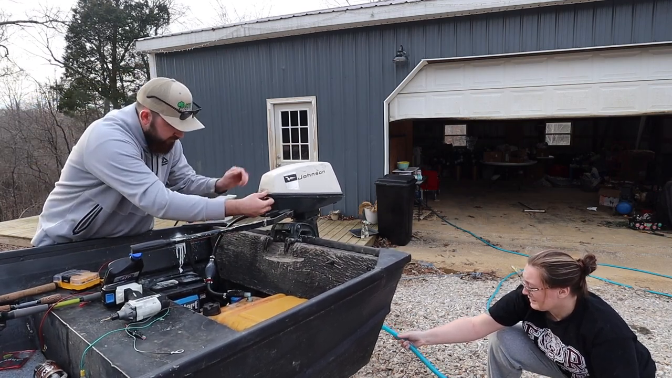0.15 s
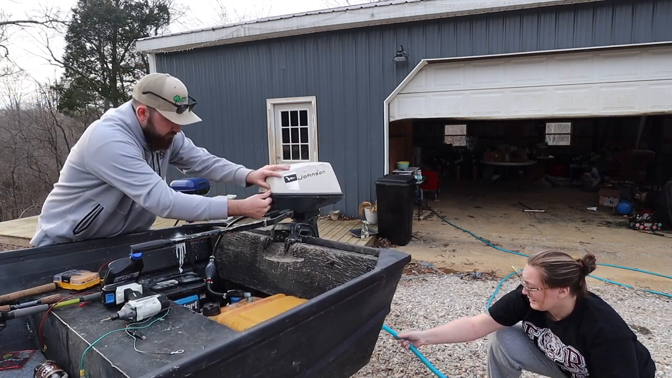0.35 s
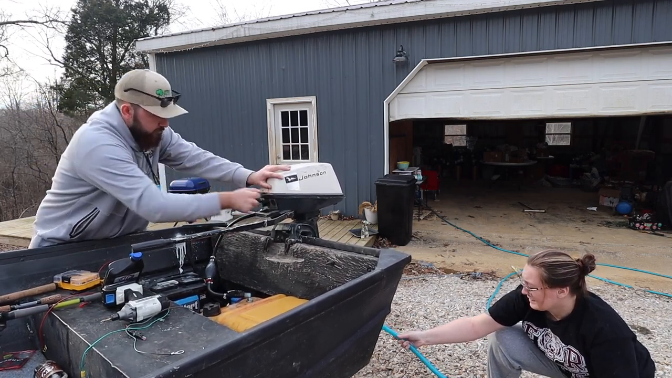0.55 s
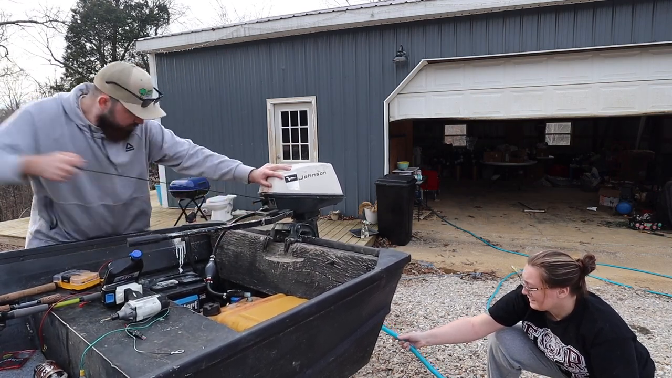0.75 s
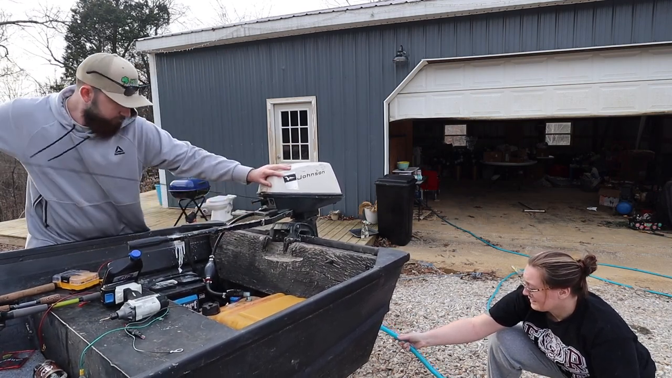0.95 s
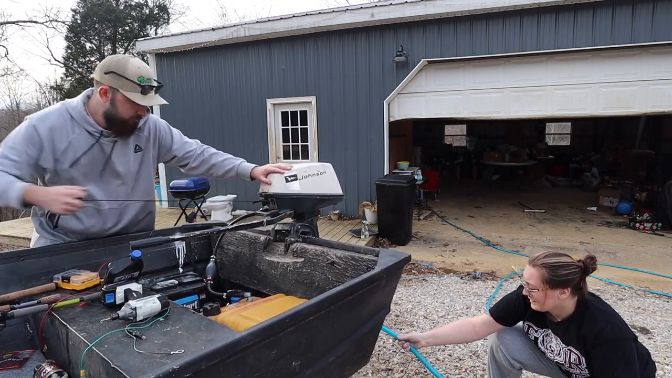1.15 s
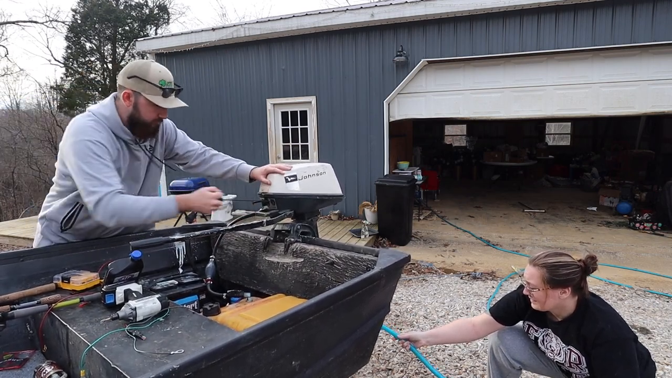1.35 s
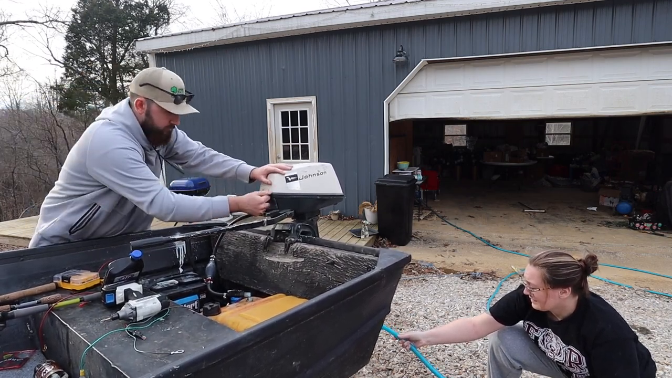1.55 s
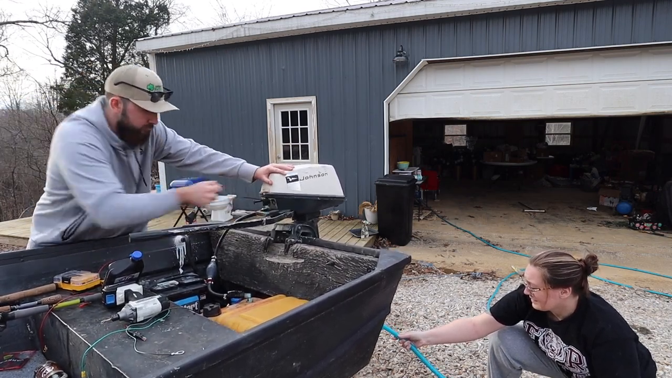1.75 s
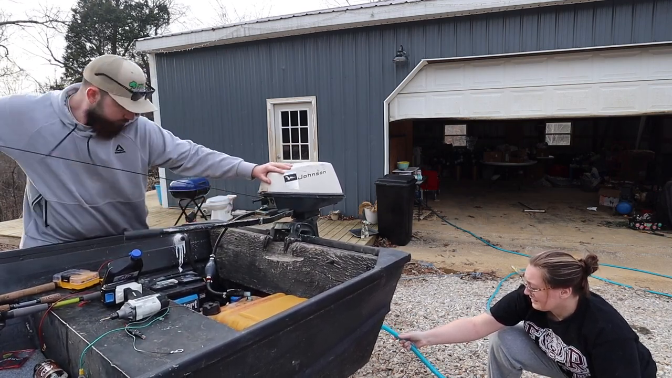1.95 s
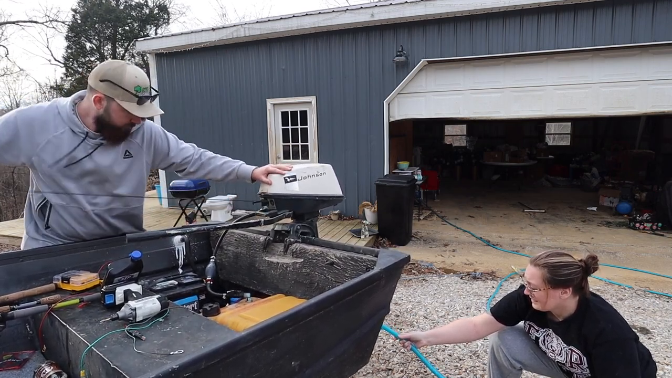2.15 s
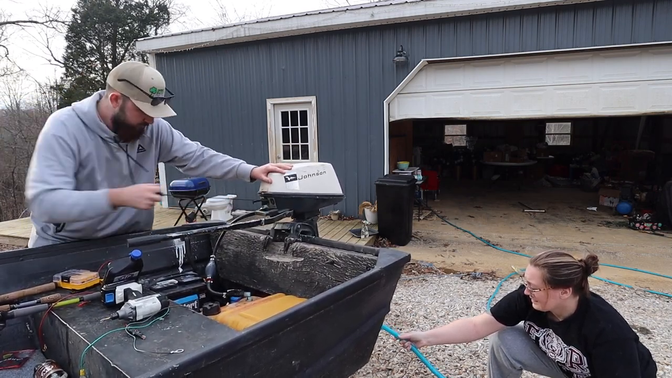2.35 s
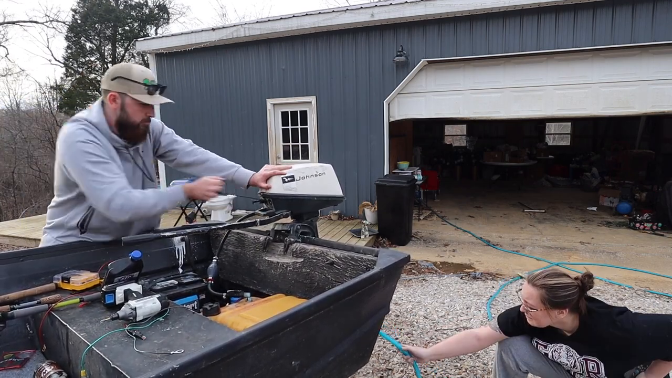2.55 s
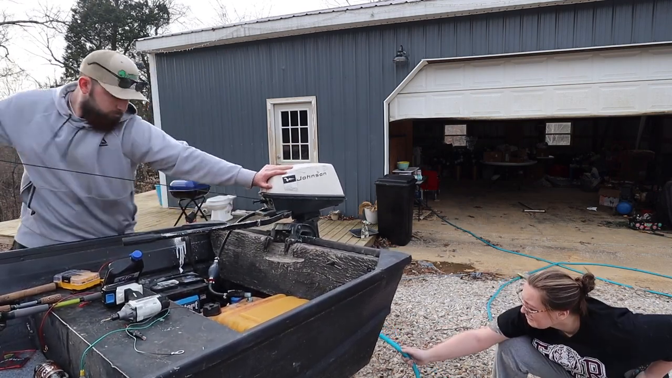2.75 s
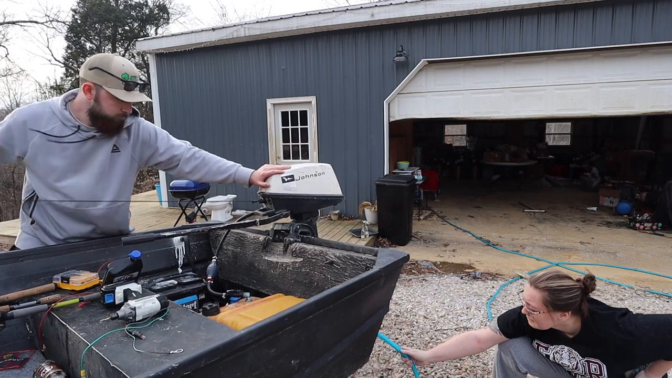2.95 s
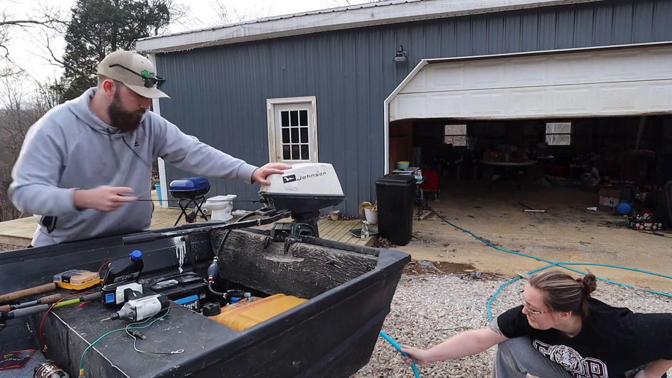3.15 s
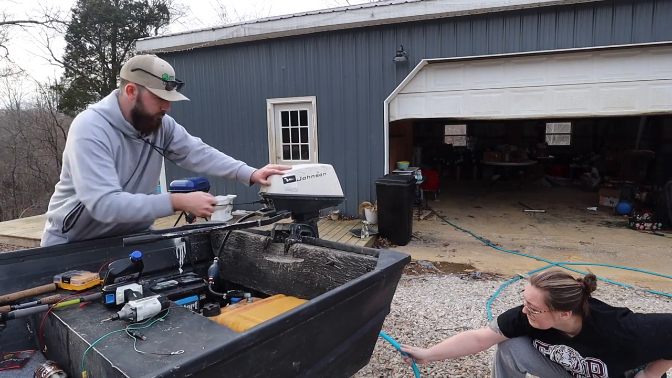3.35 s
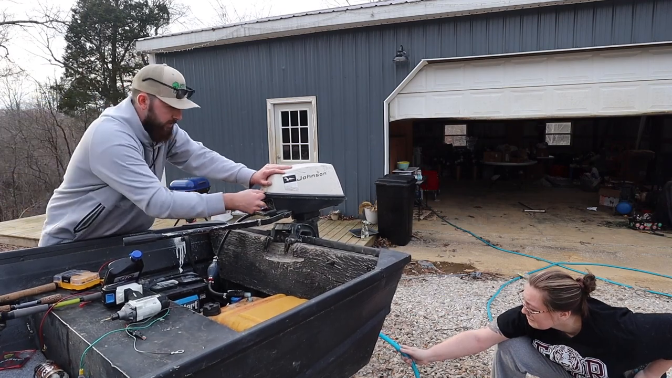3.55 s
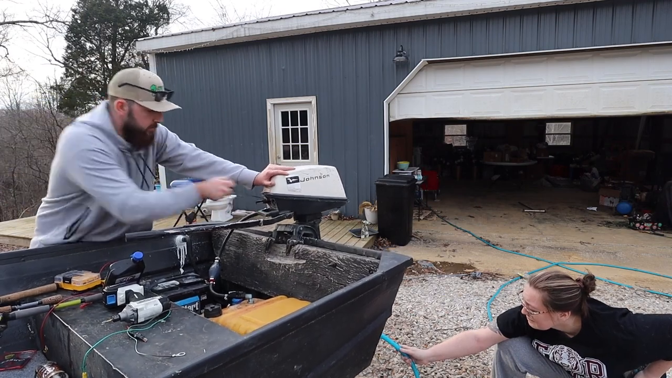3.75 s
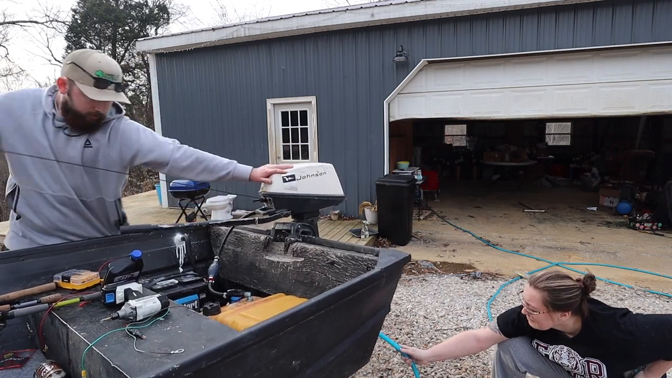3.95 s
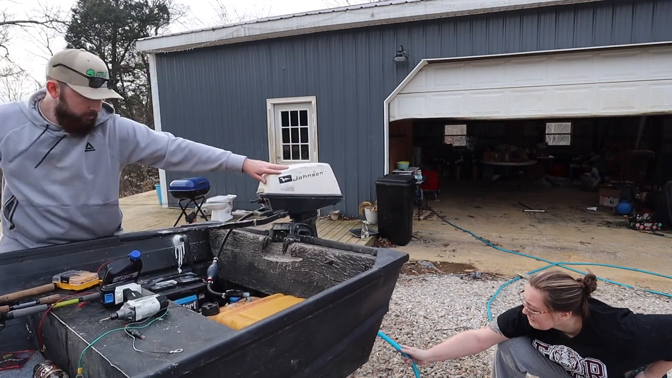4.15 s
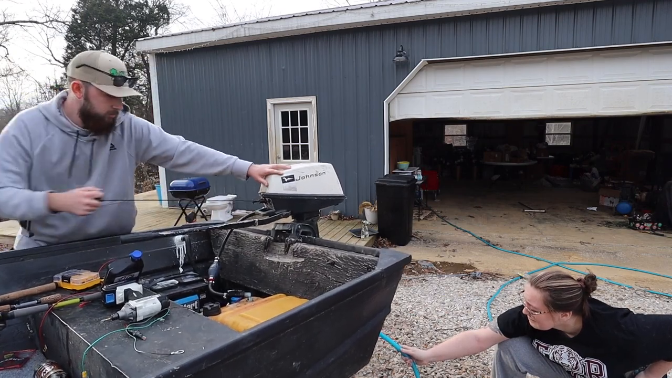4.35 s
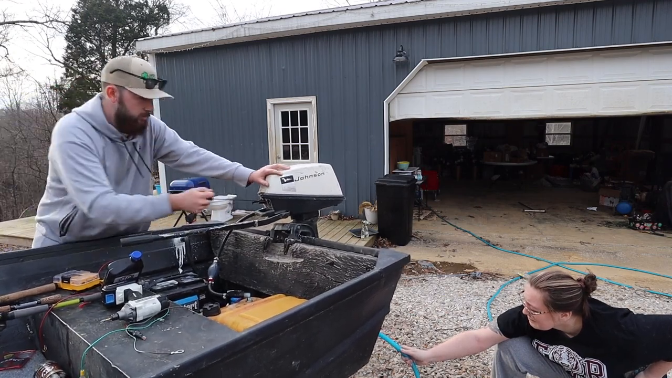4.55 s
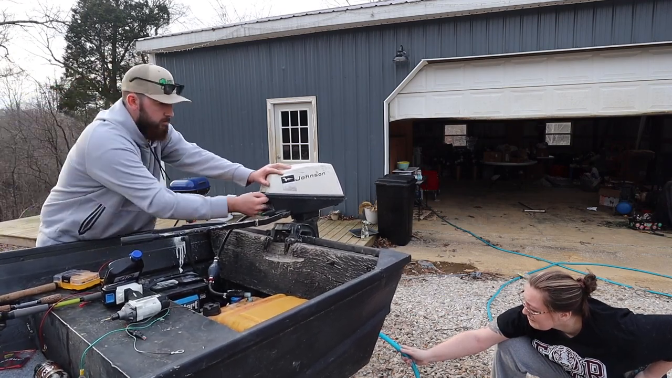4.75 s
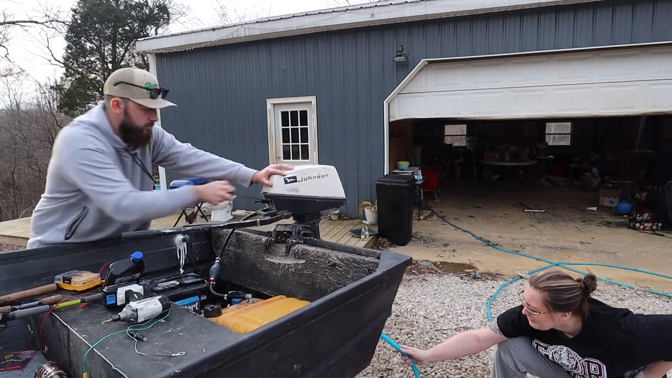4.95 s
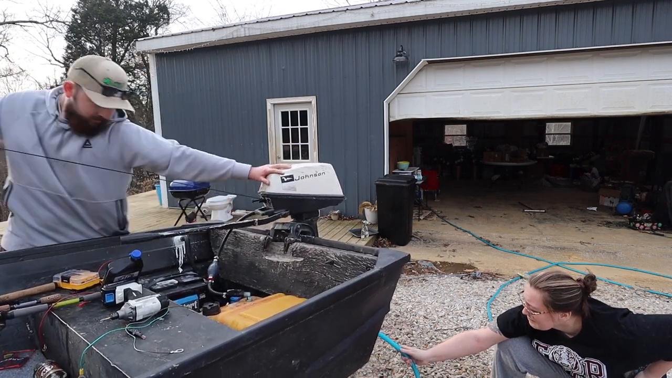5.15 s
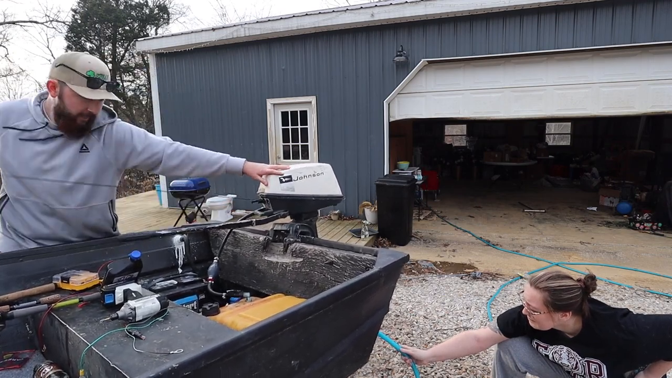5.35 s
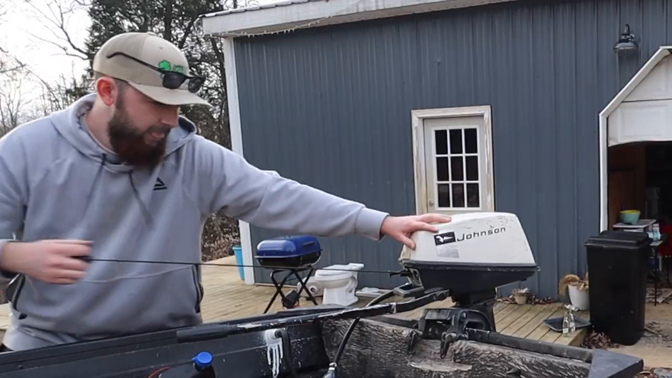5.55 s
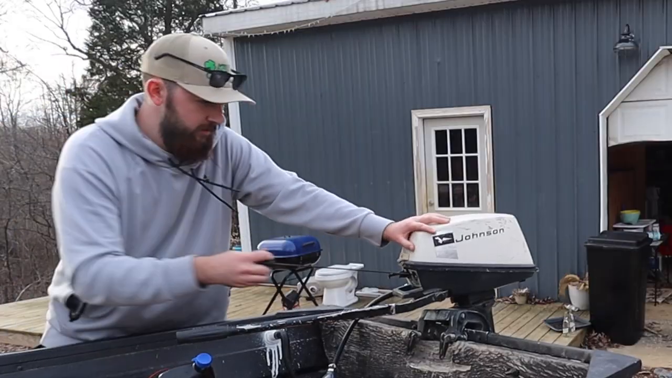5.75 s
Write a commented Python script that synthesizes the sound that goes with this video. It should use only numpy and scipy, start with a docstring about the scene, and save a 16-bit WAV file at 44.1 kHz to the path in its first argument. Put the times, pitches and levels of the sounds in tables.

```python
"""In a gravel yard, a small outboard's starter cord is pulled five times. The pinion clacks into the
flywheel, the teeth whine upward as their meshing rate rises, then the pinion drops out and the cord
rewinds. Impact and friction excite the modes of metal and cowl; the hull booms and the plastic handle
clicks. Hose water splatters on the gravel, wind buffets the microphone, a faint hum is heard at first,
and a limiter ducks under the hardest clacks."""
import sys
import numpy as np
from scipy import signal
from scipy.fft import rfft, irfft, next_fast_len
from scipy.io import wavfile
from scipy.ndimage import minimum_filter1d, map_coordinates

SR = 44100
rng = np.random.default_rng(int(sys.argv[2]) if len(sys.argv) > 2 else 0)


def wrap_up_sound(samples):
    """Save the sound to the file named by the first command line argument, as 16-bit audio."""
    columns = np.atleast_2d(samples).T
    # keep every value between -1 and 1, then stretch to whole-number steps
    tamed = np.clip(columns, -1, 1)
    steps = np.round(tamed * 32767).astype(np.int16)
    wavfile.write(sys.argv[1], SR, steps)


N = 256220

# Levels are relative within each table.
# cord rewinds: (start [s], end [s], level [dB], brightness [dB], spin-up [s], fade [dB/s])
REWINDS = [(0, .2, -37, 2, 0.026, 69), (1.05, 1.26, -15, -3, 0.06, 25), (1.31, 1.53, -18.5, -12, 0.056, 75),
           (2.15, 2.5, -16.5, -9, 0.07, 30), (2.94, 3.58, -19.5, -15, 0.082, 20.5),
           (4.17, 4.66, -18.5, -9, 0.09, 28), (5.345, 5.44, -23, -12, 0.025, 20),
           (5.45, 5.81, -20, -13, 0.064, 25)]
# water splatter as heard, stepping up abruptly at 4.7 s: (time [s], level [dB])
SPLATTER_LEVEL = [(0, -37.5), (.29, -39), (.9, -37.5), (1.0, -35.5), (1.75, -41), (2.3, -40), (2.8, -40.5),
                  (2.95, -40), (3.5, -43), (3.78, -35), (4.12, -40), (4.66, -43), (4.7, -36.5),
                  (5.81, -39.5)]
# largest drops: (time [s], level [dB], frequency [Hz])
SPLATS = [(0.216, -23, 5850), (0.5536, -11, 5450), (0.9452, -11, 6140), (1.015, -3.5, 7850),
          (1.061, -7, 7700), (1.6384, -8.5, 5700), (3.476, -12, 13300), (3.67, -8.5, 5620),
          (4.695, -12, 5630), (4.703, -6.5, 5700), (5.643, -7.5, 6100)]
# wind gusts: (time [s], level [dB], half-width [s])
GUSTS = [(.6, -52, 0.13), (1.17, -42, 0.37), (1.691, -22.5, 0.033), (2.24, -22.5, 0.12), (2.45, -36, 0.094),
         (3.08, -40, 0.074)]
# handle clicks: (time [s], level [dB], frequency [Hz])
CLICKS = [(.215, -18, 2600), (.319, -9.5, 2130), (.518, -15, 2800), (.632, -10, 4200), (1.619, -25, 2480),
          (3.617, -27, 3000), (4.879, -13.5, 2520)]
# pinion and handle knocks: (time [s], level [dB], cowl drive offset [dB], decay time [s])
KNOCKS = [(0.373, -7.5, -26.5, 0.023), (0.591, 7, -27.5, 0.0093), (1.576, -26.5, -7, 0.0066),
          (1.764, 12, -30.5, 0.016), (2.193, -0.5, -31.5, 0.0094), (2.515, 1.5, -19, 0.01),
          (2.884, -12, -26, 0.0097), (3.186, -5.5, -21, 0.008), (3.782, -18, -9, 0.013),
          (3.796, 14.5, -29, 0.015), (4.078, 2, -29, 0.0055), (4.59, -30.5, -9, 0.06),
          (4.985, 13.5, -28.5, 0.016), (5.293, 0.5, -33, 0.0073), (5.782, -28.5, -7.5, 0.022)]
# cord pulls: (start [s])
PULL_STARTS = [.612, 1.785, 2.535, 3.813, 5.003]
# the same pulls: (end [s], whine level [dB], ring level [dB], hull level [dB])
PULL_ENDS = [(.99, -11, -20, -21.5), (2.085, -16, -22, -23), (2.887, -12.5, -22, -21.5),
             (4.092, -10.5, -20.5, -24), (5.3, -18, -21.5, -20.5)]
PULLS = np.column_stack([PULL_STARTS, PULL_ENDS])
# lurches past compression: (time [s], tooth rate reached [Hz], whine level [dB], ring level [dB])
LURCHES = [(0.664, 277, -14.5, -20), (0.699, 487.3, -16, -1), (0.766, 678, -11.5, -15),
           (.795, 695, -31, -11), (0.831, 722.5, -31, -20), (0.866, 765.5, -19.5, -17.5),
           (1.816, 302, -15.5, -22), (1.85, 623, -32, -25), (1.9, 712, -24, -20), (1.932, 745, -25, -15),
           (1.961, 783, -27, -31), (2.611, 286.4, -21.5, -35), (2.645, 516.6, -28, -16),
           (2.7, 699, -24.5, -9), (2.756, 754.6, -18, -20), (3.846, 288.8, -19, -26),
           (3.861, 479.3, -27, -23), (3.88, 622.7, -21.5, -15), (3.93, 727, -36, -16),
           (3.975, 813, -20.5, -25), (5.037, 300.6, -11.5, -26), (5.055, 467, -26, -33),
           (5.07, 589.2, -30, -20), (5.119, 724, -17.5, -7), (5.15, 737, -19, -27),
           (5.175, 818.3, -18, -23), (5.214, 818.6, -13.5, -26)]
# pinion entering or leaving mesh: (time [s], level [dB], duration [s])
GRINDS = [(0.962, -12, 0.029), (1.734, -15.5, 0.056), (2.1, -9, 0.013), (2.878, -9, 0.027),
          (3.775, -18, 0.028), (4.089, -7.5, 0.023), (4.962, -18, 0.027), (5.289, -9.5, 0.022)]

# cast flywheel and housing: (frequency [Hz], bandwidth [Hz], level [dB])
METAL_MODES = [(1083, 28, -9), (1634, 20, 3.5), (1805, 27.7, 0), (1963, 87, -5), (2072, 49, 1.5),
               (2246, 21, -3), (2726, 55, -9.5), (3120, 24, 4.5), (3330, 94, -2.5), (3465, 56, 2),
               (3880, 55, -12)]
# thin pulley and spring: (frequency [Hz], bandwidth [Hz], level [dB])
PULLEY_MODES = [(4817, 35, -1), (4937, 60, -6), (5430, 80, -20), (7000, 33, -17.5), (11400, 63, -25.5)]
# cowl and hull: (frequency [Hz], bandwidth [Hz], level [dB])
COWL_MODES = [(154, 53, -4.5), (279, 70, 0.5), (455, 52, -0.5), (692, 76, 1.5), (866.4, 86, 3.5)]

# non-resonant rubbing: (frequency [Hz], level [dB])
SCRAPE_SPECTRUM = [(150, -11.5), (700, -0.5), (3000, 2), (6000, -5.5), (15000, -26)]
# fine spray: (frequency [Hz], level [dB])
SPRAY_SPECTRUM = [(120, -52), (200, -5), (268, 0), (1340, -4.5), (1610, -8), (2190, -2), (6110, -6.5),
                  (15800, -24)]
# wind on the microphone: (frequency [Hz], level [dB])
WIND_SPECTRUM = [(12, -6), (30, 3), (48, 1), (70, 10), (110, -7), (200, -43), (500, -36)]
# crack of a knock: (frequency [Hz], level [dB])
CRACK_SPECTRUM = [(150, -10), (800, -2.5), (2500, 4), (4000, -5), (6000, -8), (15000, -28)]
# thud of the rocking hull: (frequency [Hz], level [dB])
THUD_SPECTRUM = [(12, -23), (25, -32), (70, 12), (110, 8), (200, -47), (500, -68)]

TIME = np.arange(N) / SR


def amp(db):
    """Amplitude ratio of a level in decibels."""
    return 10 ** (np.asarray(db) / 20)


def unit(x):
    """Normalisation to rms 1."""
    return x / np.sqrt(np.mean(x ** 2) + 1e-20)


def gain_at(spectrum, hz):
    """Amplitude gain, with levels interpolated on a logarithmic frequency axis."""
    knots_hz, db = np.transpose(spectrum)
    return amp(np.interp(np.log(hz + 1), np.log(knots_hz + 1), db))


def curve(points):
    """Linear interpolation of (time, value) points at every sample."""
    return np.interp(TIME, *np.transpose(points))


def strokes(rows, edge_s):
    """Gating: per sample, the current row, the time since its start, and a gate open during it."""
    rows = np.array(rows)
    row = rows[np.clip(np.searchsorted(rows[:, 0] - edge_s, TIME) - 1, 0, None)].T
    since = TIME - row[0]
    return row, since, np.clip(np.minimum(since, row[1] - TIME) / edge_s + 1, 0, 1)


def wobble(rate):
    """Random modulation: a spline through `rate` Gaussian values a second."""
    return map_coordinates(rng.standard_normal(int(N * rate / SR) + 4), [TIME * rate])


def filtered(x, response):
    """Linear filtering: the spectrum is multiplied by a frequency response."""
    size = next_fast_len(N + SR // 2)
    return irfft(rfft(x, size) * response(np.fft.rfftfreq(size, 1 / SR)), size)[:N]


def ringing(x, modes):
    """Modal superposition: x drives damped resonators of alternating polarity."""
    return filtered(x, lambda f: sum(
        (-1) ** k * amp(db) * 1j * f * width / (hz * hz - f * f + 1j * f * width)
        for k, (hz, width, db) in enumerate(modes)))


def coloured(x, spectrum):
    """Spectral shaping, at rms 1."""
    return unit(filtered(x, lambda hz: gain_at(spectrum, hz)))


def grit(rate, spread_db):
    """Amplitude-modulated noise at rms 1; its level shifts about `rate` times a second."""
    return unit(rng.standard_normal(N) * amp(spread_db * wobble(rate)))


def pings(onset_s, db, hz, cycles):
    """Free decay: each impact leaves a sinusoid that falls to 1/e in `cycles` periods."""
    samples = np.arange(128)
    periods = hz[:, None] * samples / SR
    waves = amp(db)[:, None] * np.sin(2 * np.pi * periods) * np.exp(-periods / cycles)
    at = (onset_s * SR).astype(int)[:, None] + samples
    return np.bincount(at.ravel(), waves.ravel(), N)[:N]


def rewinds():
    """Friction: freewheeling pinion and spring excite the modes as the spool spins up, then slows."""
    (_, _, peak_db, bright_db, rise_s, fade), since, gate = strokes(REWINDS, edge_s=0.021)
    level_db = peak_db - 5.5 * np.clip(1 - since / rise_s, 0, 2) - fade * (since - rise_s).clip(0)
    friction = grit(400, spread_db=3.5) * amp(1.8 * wobble(30))
    force = friction * amp(level_db + 15) * gate
    pulley = ringing(force * amp(bright_db + 11.5), PULLEY_MODES)
    rub = amp(level_db - 6) * gate * coloured(friction, SCRAPE_SPECTRUM)
    return ringing(force, METAL_MODES) + pulley + amp(-6) * ringing(force, COWL_MODES) + rub


def water():
    """Jet break-up: fairly even spurts of drops crackle over a spray; the largest burst as splats."""
    spurts = 800  # the six drops of each land together and have a like size
    timing, strength, pitch = rng.random((spurts, 3)).T[..., None]
    drop_lag, drop_strength, drop_pitch = np.moveaxis(rng.random((spurts, 6, 3)), -1, 0)
    onset_s = (np.arange(spurts)[:, None] + timing) / (spurts + 1) * N / SR + 0.0061 * drop_lag
    db = 11 * strength ** 2 + 8 * drop_strength
    hz = np.clip(3900 * 2.64 ** pitch * 1.635 ** (2 * drop_pitch - 1), 0, 15500)
    crackle = unit(pings(onset_s.ravel(), db.ravel(), hz.ravel(), cycles=2.4))
    spray = coloured(grit(25, spread_db=2.2), SPRAY_SPECTRUM)
    splatter = amp(curve(SPLATTER_LEVEL) + 6) * (crackle * amp(0.38 * wobble(9.1)) + amp(-1.5) * spray)
    onset_s, db, hz = np.transpose(SPLATS)
    splats = sum(
        pings(onset_s + lag_s, db - loss_db, hz * np.exp(rng.normal(0, scatter, len(hz))), cycles=6.6)
        for lag_s, loss_db, scatter in [(0, 8.8, 0.029), (.0004, 2, 0.48), (.0012, 8, 0.18)])
    return splatter + splats


def wind():
    """Turbulence: low-frequency pressure fluctuations buffet the microphone in gusts."""
    breeze = amp(-48.5)
    gusts = sum(amp(db) * np.exp(-((TIME - s) / width) ** 2) for s, db, width in GUSTS)
    buffeting = amp(3.11 * wobble(12)) * coloured(rng.standard_normal(N), WIND_SPECTRUM)
    return (breeze + gusts) * unit(buffeting)


def hum(hz=94, end_s=0.66):
    """Amplitude and frequency modulation: a faint low tone wavers, then stops."""
    envelope = amp(-43 + 1.3 * wobble(9.6)) * np.clip((end_s - TIME) / 0.054, 0, 1)
    return envelope * np.sin(2 * np.pi * np.cumsum(hz + 3 * wobble(14)) / SR)


def clicks():
    """Damped vibration: three quick contacts of the plastic handle make each short, hollow click."""
    onset_s, db, hz = np.transpose(CLICKS)
    return sum(pings(onset_s + lag_s, db - loss_db, hz * ratio, cycles=3.6)
               for lag_s, loss_db, ratio in [(0, 4, 1.45), (.0012, 0.1, 1.01), (.003, 5, .85)])


def knocks(attack_s=.0012):
    """Impact excitation: a brief chatter of contacts cracks and sets metal and cowl ringing."""
    sharp, heavy = np.zeros((2, N + SR))
    t = np.arange(SR // 10) / SR
    for s, db, cowl_db, decay_s in KNOCKS:
        envelope = np.exp(-(t / decay_s) ** 2) * np.clip(t / attack_s, 0, 1)
        chatter = amp(db) * envelope * rng.standard_normal((2, len(t)))
        sharp[round(s * SR):][:len(t)] += chatter[0]
        heavy[round(s * SR):][:len(t)] += chatter[1] * amp(cowl_db)
    crack = filtered(sharp[:N], lambda hz: gain_at(CRACK_SPECTRUM, hz))
    metal = ringing(sharp[:N], METAL_MODES)
    return amp(-11.5) * crack + amp(-5.5) * metal + amp(29.5) * ringing(heavy[:N], COWL_MODES)


def flywheel(crawl_hz=163.6, climb_hz_per_s=9000, sag_hz_per_s=200, rise_s=.014, fade_s=0.023):
    """Varying load: each lurch past compression lifts the tooth rate and makes whine and ring surge."""
    points, surges = [], 0
    for start, end, *_ in PULLS:
        points.append((start, crawl_hz))
        for s, hz, *db in (row for row in LURCHES if start < row[0] < end):
            last_s, last_hz = points[-1]
            release_s = np.clip(s - (hz - last_hz) / climb_hz_per_s, last_s + .001, s - .001)
            sagged_hz = max(last_hz - sag_hz_per_s * (release_s - last_s), crawl_hz)
            points += [(release_s, sagged_hz), (s, hz)]
            # the whine surges as the climb begins, the ring as it ends
            attack = np.clip((TIME - [[release_s], [s]]) / rise_s + 1, 0, 1)
            surges = surges + amp(db)[:, None] * attack * np.exp(-(TIME - s).clip(0) / fade_s)
        last_s, last_hz = points[-1]
        points.append((end, last_hz - sag_hz_per_s * (end - last_s)))
    return curve(points), surges


def pulls(rise_s=0.068, fade_db_per_s=45, blow_cutoff_hz=2770, rub_cutoff_hz=6460):
    """Gear meshing: periodic tooth impacts whine in harmonics, growl in the cowl and ring the metal."""
    (_, _, whine_db, ring_db, _), since, gate = strokes(PULLS, edge_s=0.003)
    tooth_hz, (whine_surge, ring_surge) = flywheel()
    effort = amp(whine_db - fade_db_per_s * since.clip(0)) * np.clip(since / rise_s, .4, 1)
    load = gate * (effort + whine_surge)
    drone = gate * amp(ring_db) * np.clip(since / rise_s, .1, 1)
    clang = gate * ring_surge
    phase = 2 * np.pi * np.cumsum(tooth_hz * (1 + .025 * wobble(160))) / SR
    throb = amp(3.5 * wobble(45))
    harmonics = sum(amp(db + 5 * wobble(85)) / 1.25 * np.sin(k * phase)
                    for k, db in [(1, 2), (2, -4), (3, -11), (4, -18), (5, -23)])
    whine = amp(-0.5) * load * harmonics * np.sqrt(throb)
    pulses = np.exp(12 * np.cos(phase)) * amp(3.5 * wobble(500))  # one per tooth
    teeth = unit(pulses * throb) + 0.55 * grit(300, spread_db=4.5) * throb
    # loaded teeth strike dully and favour the gear's own pair of modes
    blows = filtered(teeth * (drone + clang) * amp(14), lambda f: 1 / (1 + 1j * f / blow_cutoff_hz) ** 2)
    metal = ringing(blows, METAL_MODES) + amp(5.5) * ringing(blows, METAL_MODES[3:5])
    build_up = since.clip(0) / .35
    pulley = ringing(drone * build_up * grit(300, spread_db=2), PULLEY_MODES)
    scrape = coloured(grit(200, spread_db=2.5), SCRAPE_SPECTRUM)
    rub = (drone + .3 * clang) * filtered(scrape, lambda f: 1 / (1 + (f / rub_cutoff_hz) ** 2))
    growl = load * np.sqrt(tooth_hz / tooth_hz.max()) * (unit(teeth) + grit(100, spread_db=2))
    return whine + metal + amp(17.5) * pulley + amp(8) * ringing(growl, COWL_MODES) + amp(0.1) * rub


def hull(lag_s=0.051, rise_db_per_s=40.5, fall_db_per_s=77, rest_db=-63):
    """Forced vibration: the motor rocks the hull harder through each pull, most just after it ends."""
    past_peak = TIME - (PULLS[:, 1:2] + lag_s)
    swell_db = np.where(past_peak < 0, rise_db_per_s * past_peak, -fall_db_per_s * past_peak)
    rocking = amp(PULLS[:, -1:] + swell_db).sum(axis=0) + amp(rest_db)
    boom = unit(ringing(grit(15, spread_db=2.5), COWL_MODES[:1]))
    thud = coloured(grit(12, spread_db=1), THUD_SPECTRUM)
    return rocking * (boom + amp(-10) * thud)


def grinds():
    """Sliding contact: entering or leaving mesh, the pinion makes the flywheel's middle modes squeal."""
    swell = sum(amp(db) * np.sqrt(np.sin(np.pi * np.clip((TIME - s) / length, 0, 1)).clip(0))
                for s, db, length in GRINDS)
    squeal = ringing(swell * grit(240, spread_db=3), METAL_MODES[1:5])
    return amp(16.5) * squeal + amp(-8) * swell * coloured(rng.standard_normal(N), SCRAPE_SPECTRUM)


def yard(x, reverb_time_s=0.35):
    """Reverberation: diffuse reflections from boat and wall decay exponentially."""
    t = np.arange(SR // 4) / SR
    tail = rng.standard_normal(len(t)) * amp(-60 * t / reverb_time_s) * (t > .004)
    return signal.fftconvolve(x, tail / np.linalg.norm(tail))[:N]


def limiter(x, limit_db=-8, attack_s=0.00081, hold_s=.025, release_db_per_s=45):
    """Automatic gain control: gain drops just after the level passes the limit, holds, then recovers."""
    def smoothed(v, seconds):
        return signal.lfilter([1 / (seconds * SR)], [1, 1 / (seconds * SR) - 1], v)

    over_db = np.clip(10 * np.log10(smoothed(x ** 2, 0.0055) + 1e-12) - limit_db, 0, None)
    half_hold = round(hold_s * SR) // 2
    held_db = -minimum_filter1d(-over_db, 2 * half_hold + 1, origin=half_hold)
    climb_db = release_db_per_s * TIME
    reduction_db = np.maximum.accumulate(held_db + climb_db) - climb_db
    return x * amp(-smoothed(reduction_db, attack_s))


def scene():
    """Superposition: the starter, its reflections and the other sources add in one channel."""
    starter = pulls() + grinds() + rewinds() + knocks() + clicks()
    return (starter + amp(-16) * yard(starter) + water() + wind() + hull() + hum())[None]


def record(dry, dip_s=5.44, top_hz=15900):
    """Limiting and saturation: the level dips briefly once, peaks duck and clip, and the top is cut."""
    dip = np.clip(np.abs(TIME - dip_s) / 0.007, .06, 1)
    limited = limiter(dry[0] * dip)
    clipped = limited / (1 + np.abs(limited / 1.05) ** 6) ** (1 / 6)
    return filtered(clipped, lambda hz: hz < top_hz)[None]


dry = scene()
out = record(dry)
wrap_up_sound(out)
```